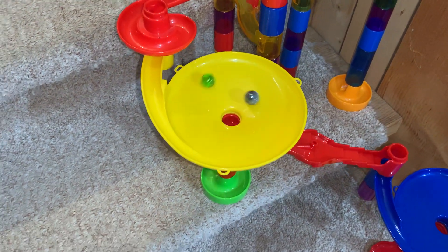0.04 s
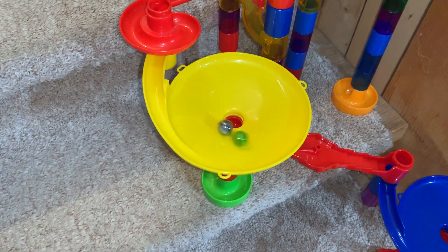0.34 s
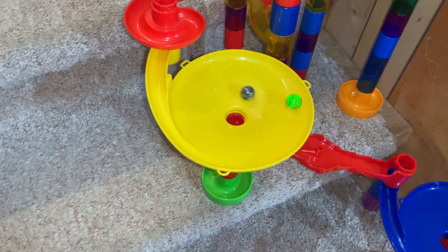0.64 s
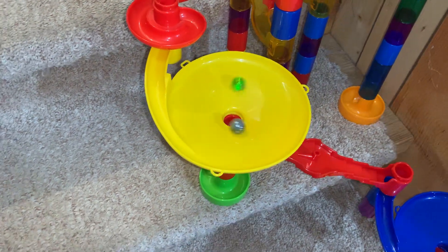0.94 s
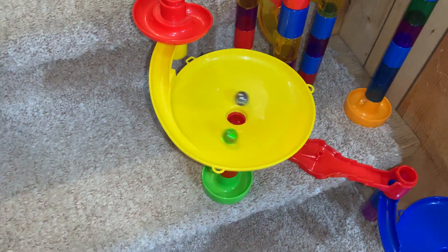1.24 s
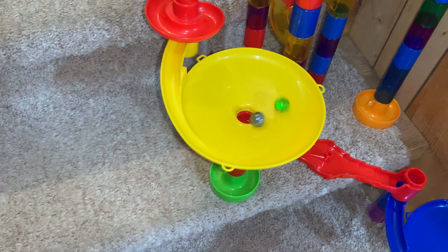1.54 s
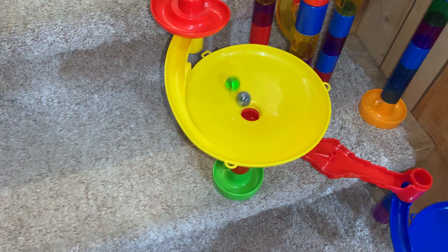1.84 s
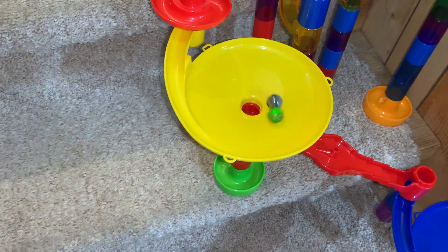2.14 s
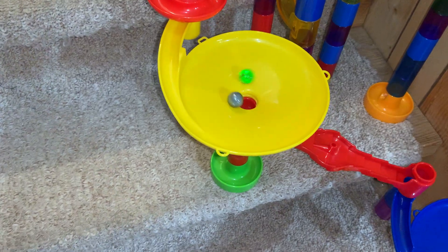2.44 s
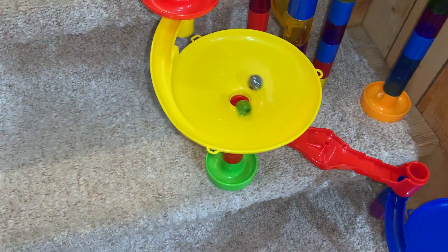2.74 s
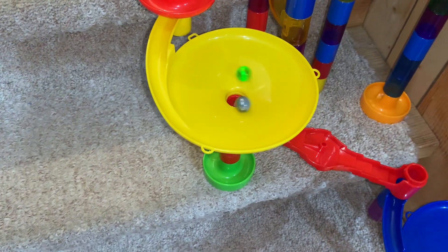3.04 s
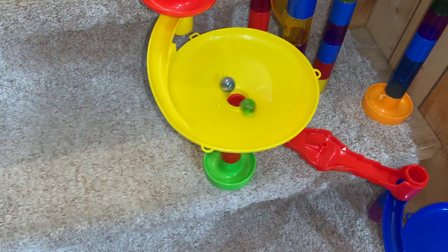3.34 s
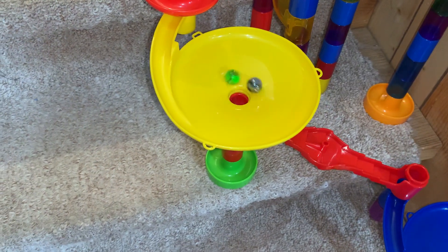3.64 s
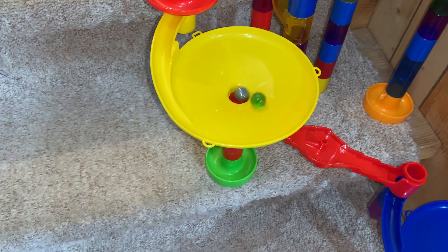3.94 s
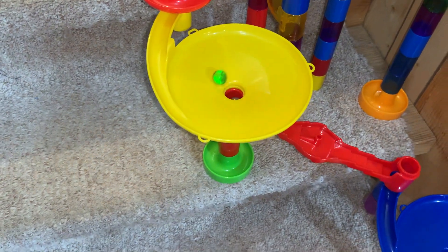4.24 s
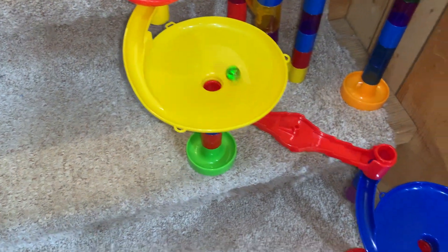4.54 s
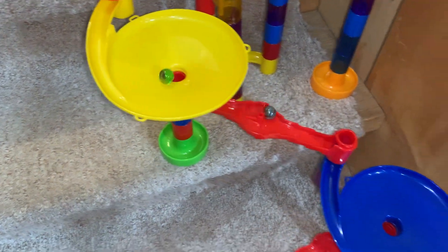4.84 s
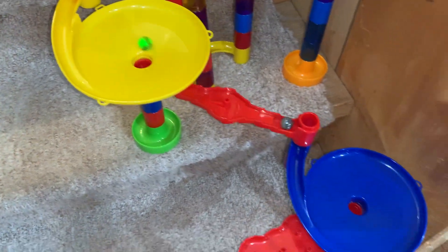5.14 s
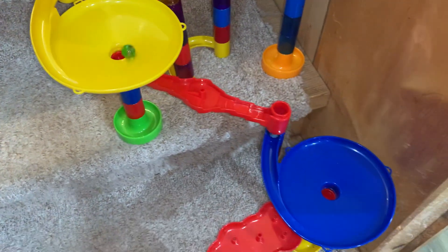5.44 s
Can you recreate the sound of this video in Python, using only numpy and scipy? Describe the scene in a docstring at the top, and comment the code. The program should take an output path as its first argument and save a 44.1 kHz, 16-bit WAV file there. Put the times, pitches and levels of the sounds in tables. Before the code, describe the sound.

A steel marble and a glass marble circle a plastic funnel with a hollow, gritty rolling sound, swelling each turn and dotted with light ticks. The steel one whirls faster, drops with a sharp clack, bounces and clatters down a bumpy plastic ramp into a tube, while the other rolls on faintly. Heard in stereo in a small carpeted room over a low rumble and hum.

```python
"""Two marbles in a marble run

A stereo microphone pair in a small carpeted room. A steel and a glass marble circle a plastic funnel,
ringing its modes and swelling once a turn as their orbits quicken. They touch once. The steel one whirls
round the throat, drops, bounces and clatters down a bumpy ramp into a tube while the glass one rolls on.
A low rumble and a steady hum lie underneath."""
import sys
import numpy as np
from scipy import signal
from scipy.fft import rfft, irfft, next_fast_len
from scipy.io import wavfile
from scipy.ndimage import uniform_filter1d

SR = 44100
rng = np.random.default_rng(int(sys.argv[2]) if len(sys.argv) > 2 else 0)


def unload_audio(sound):
    """Save the sound as a 16-bit wav file, at the path given as the first command line argument."""
    columns = np.transpose(np.atleast_2d(sound))
    # keep every value between -1 and 1, then stretch to whole-number steps
    steps = np.round(np.clip(columns, -1, 1) * 32767)
    wavfile.write(sys.argv[1], SR, steps.astype(np.int16))


N = 250488
TIME = np.arange(N) / SR
ROOM_SAMPLES, RING_SAMPLES = 16384, 6144  # lengths of the room tail and of a part's ring
KNOCK_S = .02  # a knock's level refers to its energy spread over this time

# The glass marble circles wide and fades; the steel one whirls up near the throat and drops.
# Each row: time in seconds, level in dB, grit offset in dB.
GLASS_ROLL = [(0, -39.5, -19), (0.65, -44, -18.5), (1.8, -43, -20), (2.5, -46, -21), (3.3, -54.5, -16.5),
              (4.4, -46, -20.5), (5.3, -64, -25), (5.68, -69, -25)]
STEEL_ROLL = [(0, -47, -40), (0.85, -46.5, -34), (0.97, -50.5, -3), (1.24, -46.5, -11), (1.36, -49, -26),
              (2.7, -44.5, -16), (3.13, -43, -27), (3.22, -42.5, -21.5), (3.7, -43.5, -24.5),
              (3.88, -33.5, -9), (4.08, -33.5, 1.5), (4.14, -41.5, 10.5), (4.17, -52, -19)]
# Orbits quicken as they shrink.
# Each holds: starting turns per second, their gain per second, first loud moment in turns.
GLASS_ORBIT = (1.0, .25, .2)
STEEL_ORBIT = (2.44, .29, .26)
# Rough spots under the glass marble.
# Each row: middle in seconds, length in seconds, level in dB, grit offset in dB, whirr offset in dB.
GLASS_SCUFFS = [(0.03, 0.034, -45, -5.5, 1.5), (0.175, 0.058, -36, -11, -9), (0.338, 0.051, -42, -13, -5),
                (0.5, 0.097, -41.5, -12.5, -18), (0.945, 0.048, -41.5, -8, 1), (1.05, 0.026, -40, -16, -16),
                (1.25, 0.026, -35, -13, -12), (1.42, 0.024, -38, -15.5, -13), (1.59, 0.048, -43.5, -4, 0),
                (1.728, 0.022, -47.5, 0, 11), (1.852, 0.009, -41, -25, -14), (2.05, 0.049, -46.5, -3.5, -9),
                (2.29, 0.042, -42, -14, -14), (2.425, 0.057, -35, -17, -29), (2.56, 0.013, -35, -22, -14),
                (2.755, 0.029, -38.5, -14, -7.5)]
# The steel marble's chatter on the ramp, weaker while it hops. Each row: time in seconds, level in dB.
RAMP_CHATTER = [(4.41, -53), (4.46, -40), (4.58, -45.5), (4.69, -38), (4.77, -46), (4.86, -37),
                (4.91, -50.5), (4.97, -43), (5.09, -46), (5.16, -58.5), (5.25, -37.5), (5.33, -37),
                (5.39, -62)]

# Knocks along the run; the spot of contact decides which modes ring. Each row: start in seconds,
# level in dB, then offsets in dB for the low modes, those near 1.3 kHz, the upper ones and the click.
FUNNEL_KNOCKS = [(0.325, -44.5, -5, 4, 6, -2), (0.515, -42, 8, 4, -3, -7), (0.797, -45.5, -7, 6, 2, -11.5),
                 (0.9404, -37.5, -5, -8, 3, -15), (1.047, -31.5, -14, -3, -13, -11),
                 (1.212, -40, -11, 3, -8, -6), (1.367, -35, -6, -7, -15, -36),
                 (1.5415, -40.5, 3, -6, -1, -8.5), (1.578, -39.5, 1, 0, -1, -23),
                 (1.701, -37.5, -10, -18, -1, -15), (1.847, -31, -1.5, -7, -15, -33),
                 (1.893, -33, -23, -6, -12, -23), (1.997, -41, 10, 10, 1.5, -6.5),
                 (2.062, -42, 4.5, 4, -1, -7), (2.521, -37.5, -3, -1, -14, -8),
                 (2.672, -49.5, 16.5, 16, 5, 0), (2.853, -44, 10, 12, -5, -26),
                 (2.9065, -35, -9, -7, -12, -30), (3.106, -36, -1, -2, -16.5, -30),
                 (3.146, -45, 11.5, 10.5, -15, -10.5), (3.292, -56.5, 10, 6, 10, -7),
                 (3.486, -40, -3, 7, -10, -22), (3.6414, -41, 2, 6, -12, -23),
                 (3.7267, -48, -11, -1, -6, -27), (3.822, -42.5, 11, -11, 7, -4),
                 (3.880, -40.5, 1, -10, 4, -20), (3.894, -28, 3, -8, -4, -13),
                 (3.921, -34.5, -1, -7, -6, -0.5), (4.0006, -36, 10.5, -2, -7, 7.5),
                 (4.0096, -28, -2, -16, -8, -3), (4.0266, -37, 13, -15, -2, 8), (4.040, -41, 11, -7, 2, 1),
                 (4.0708, -28.5, 5.5, -8, -6, 7.5), (4.129, -39, -4, -4.5, -5, 4),
                 (5.655, -39, 5, -1, 0, -9)]
DROP_KNOCKS = [(4.1508, -6, -4, 0, -21, -6), (4.156, -21.5, -9, 0, 9.5, 8),
               (4.1615, -13, -13.5, 0, -16, -14), (4.3678, -34, 5.5, 0, -9, -31)]
RAMP_KNOCKS = [(4.4412, -14.5, -6.5, 2.5, -7.5, -2), (4.469, -27.5, 0.5, -5, -11, 3.5),
               (4.486, -28, -11, 5, -17, -11), (4.527, -17.5, 1, -5.5, -3, -2),
               (4.5998, -16.5, -2.5, 2, 0, 1), (4.634, -38, 3, 0, -0.5, -10.5),
               (4.6517, -24, 0.5, 2, -0.5, 4.5), (4.6685, -26, 3, 6, -19, 10),
               (4.7015, -22.5, 1.5, 4, 6.5, 5.5), (4.709, -23.5, 0, -5, 4, -6),
               (4.779, -34.5, -3.5, 6, -5, -7), (4.802, -47, -2.5, 4, -3.5, -13),
               (4.8238, -20.5, -5, -8, 4.5, 1.5), (4.848, -30, -5.5, 9.5, -4, 0),
               (4.9335, -17, -5, 5.5, -2.5, 1.5), (4.9525, -28, -4, 0, -8, 0.5),
               (5.0277, -17.5, 0, 1.5, 6.5, -1), (5.1055, -13.5, -6, -7, -9, -5.5),
               (5.1765, -24, -5, -0.5, 10.5, 2.5)]
TUBE_KNOCKS = [(5.2132, -17.5, 5.5, 2.5, -5.5, 5.5), (5.224, -31.5, 3.5, 0, -5, -4.5),
               (5.2398, -21.5, -1.5, 5, 0, -1), (5.255, -34.5, -2.5, 1, 3, -12),
               (5.2712, -15.5, 3.5, -5.5, 8.5, 3), (5.2808, -30, -0.5, 1, 5, 10),
               (5.3052, -42, -4, 2, 12, 3.5), (5.319, -33.5, 3, 1.5, -8.5, 8.5)]

# What each kind of contact excites in the plastic. Each row: frequency in Hz, relative level in dB.
BOWL_PUSH = [(200, 8.5), (600, -4.5), (800, -3), (1080, -1), (1330, -6), (1500, 1), (1950, -0.5),
             (2400, -5), (5000, -22.5), (9000, -31.5)]  # soft rolling out in the bowl reaches many modes
THROAT_PUSH = [(200, -5), (600, -7), (820, 1.5), (1050, 0), (1300, 2.5), (1500, -6), (1850, -7),
               (3000, -17), (6000, -41.5)]  # near the throat, mainly the low ones
GLASS_GRIT = [(1400, -18), (2000, -3), (2700, 2), (3700, -4), (4800, 7), (5600, 8), (7000, -1.5),
              (10000, -3.5), (13000, -19), (15000, -27)]
STEEL_GRIT = [(1400, -10.5), (2000, -0.5), (2700, 2.5), (3700, -7), (4800, 6), (5600, -0.5), (7000, 3),
              (9000, -5), (10100, 1), (11500, -9), (13000, -6.5), (15000, -6)]  # harder, so it sparkles higher up
WHIRR_PUSH = [(1500, -32), (2000, 6), (2300, 4), (2750, 8), (3100, -23), (5000, -16.5)]
LANDING_PUSH = [(280, 8), (500, 1.5), (800, -2), (1250, -4.5), (1600, 4.5), (2100, 2.5), (2600, 0),
                (12000, 4)]
SLAP_PUSH = [(300, -9), (800, -1.5), (1600, -3.5), (2200, -5.5), (4000, -21), (9000, -26.5)]
CHATTER_PUSH = [(300, 6.5), (900, 0), (2000, 4), (4000, -0.5), (6500, -1), (12000, -14)]

# Main modes of the plastic parts. Each row: frequency in Hz, width in Hz, relative level in dB.
FUNNEL_MODES = [(302, 76, -21), (414, 90, -20.5), (600, 42, -18.5), (811.2, 34.7, 2), (871, 20, -5.5),
                (1259.6, 20.6, 0.5), (1331, 24.5, 3.5), (1474, 54, -12), (1638, 18, -0.5), (1861, 31, -2),
                (1746, 30, -8.5), (1950, 71, 1), (2130, 53, -11.5), (2449, 62, -7), (2713, 35, -6.5),
                (2856, 25, -4), (3994, 34, -8), (4685, 140, -19), (6316, 44, -16.5), (6960, 130, -15.5)]
RAMP_MODES = [(361, 19, -18.5), (481, 22, -21.5), (554, 15, -18), (825.3, 25.6, 3), (862, 25, -5),
              (892, 25, -7.5), (1240, 11, -3), (1360, 42, -19.5), (1533, 23.3, 3.5), (1640, 41, -6),
              (1930, 73, -9.5), (2034, 22, -7.5), (2130, 40, -11.5), (2200, 20, -20), (2553, 43, -2.5),
              (2675, 44, -20), (3170, 14, -28), (3614, 39, -14.5), (4260, 28, -13.5), (4890, 50, -17),
              (6150, 52, -16), (7250, 83, -29), (11900, 91, -34)]
TUBE_MODES = [(343, 14, -19), (477, 12, -14.5), (578, 7.2, -16), (805, 24.3, 3.5), (838, 33.5, 1.5),
              (878, 25, 3.5), (1256, 17, -2), (1580, 25, -11), (1653, 29, -4), (1960, 44, -10.5),
              (2057, 40, -3), (2230, 21, -4), (2551, 29, 3.5), (2840, 49, -10.5), (3100, 63, -18.5),
              (4220, 55, -15)]
# The crowd of weaker shell modes. Each row: frequency in Hz, relative level in dB.
FUNNEL_SHELL = [(150, -20.5), (400, 4), (650, 0), (1100, 7), (1450, -12), (2000, 10.5), (2300, 0),
                (2700, 3.5), (4000, 0.5), (5400, -10), (6700, -4), (8500, -3.5), (10200, -3.5),
                (15000, -10)]
RAMP_AND_TUBE_SHELL = [(150, -7), (400, -15.5), (650, -15), (820, 1), (1050, 7.5), (2000, -0.5),
                       (3200, 0.5), (5300, -6), (7500, 2), (9000, -1), (11000, -1.5), (13000, -10.5),
                       (15000, -5)]

# Low background rumble, with a faint whirr of rolling near 1.5 kHz.
# Each row: frequency in Hz, relative level in dB.
RUMBLE_SPECTRUM = [(15, -76.5), (25, -48), (32, -23.5), (45, -5), (58, -0.5), (80, 1.5), (98, -9),
                   (125, -5), (170, -13.5), (260, -17.5), (400, -17.5), (700, -27), (1500, -22.5),
                   (2500, -49), (7000, -62.5), (16000, -60)]
# The rumble eases once only one marble is left in the funnel. Each row: time in seconds, level in dB.
RUMBLE_LEVEL = [(0, -42), (0.9, -42.5), (2.1, -42.5), (3.4, -43), (4.8, -43.5), (5.35, -45.5),
                (5.68, -45.5)]
# The room's hum. Each row: frequency in Hz, rms level in dB.
HUM_TONES = [(75.4, -73), (120, -60.5), (220.8, -49.5), (592, -71)]

# Stereo width at the microphones. Each row: frequency in Hz, side minus mid in dB.
MIC_WIDTH = [(60, -18), (130, -19.5), (300, -7.5), (800, -7.5), (1500, -0.5), (2500, 8), (5500, 8.5),
             (7500, -18.5), (16000, -0.5)]
# Phase between the microphones. Each row: frequency in Hz, lead of the left in radians.
MIC_PHASE = [(60, 0), (5000, 0), (7200, -1.4), (8500, -3.14), (10700, -6.1), (13300, -9.42), (15500, -12.3)]
# Their unequal sensitivity. Each row: frequency in Hz, left minus right in dB.
MIC_BALANCE = [(60, 0.5), (200, -4.5), (380, -0.5), (750, 2), (1300, 1.5), (2400, -0.9), (4400, -5),
               (8000, 0), (15000, 0.5)]


def rolling(funnel, motion, push_spectrum, grit_spectrum, specks, flutter_db, body_db, grit_db, glide_db,
            sectors=5, glide_hz=1880, swing_hz=201, half_width_hz=225):
    """A marble runs over countless tiny bumps, driving the funnel with soft push, grit and any whirr."""
    angle, push, sharp, whirr = motion
    flutter = amp(flutter_db * walk(70))
    drives = [(grit(scatter_db=1.5, share=.05) * push * amp(body_db), push_spectrum),
              (specks * sharp * amp(grit_db), grit_spectrum)]
    if whirr.any():
        drives.append((grit() * whirr, WHIRR_PUSH))
    out = 0
    for sector in 2 * np.pi * np.arange(sectors) / sectors:
        # each sector of the bowl favours other modes, so the ring glides down and up once a turn
        presence = flutter * np.maximum(np.cos(angle - sector), 0) * np.sqrt(4 / sectors)
        hz = glide_hz + swing_hz * np.cos(sector + .99)
        band = [(hz - half_width_hz, 0), (hz, glide_db), (hz + half_width_hz, 0)]
        spot = colour(funnel(sector, waver=.012), band)
        for force, spectrum in drives:
            out = out + convolve(force * presence, unit_energy(colour(spot, spectrum)))
    return out


def circling(roll, orbit, swing_db, scuffs=()):
    """A marble's angle in the bowl and the strengths of its soft push, its grit and its whirr."""
    start_hz, quickening, loud_turn = orbit
    angle = 2 * np.pi * (start_hz * TIME + quickening * TIME ** 2 / 2 - loud_turn)
    times, *columns = np.transpose(roll)
    level_db, grit_db = (np.interp(TIME, times, column) for column in columns)
    push = amp(level_db + swing_db * np.cos(angle))
    sharp, whirr = push * amp(grit_db), np.zeros(N)
    for middle_s, length_s, db, rough_db, whirr_db in scuffs:
        swell = amp(db) * np.exp(-2 * np.minimum(((TIME - middle_s) / length_s) ** 2, 20))
        push = np.hypot(push, swell)
        sharp = np.hypot(sharp, swell * amp(rough_db))
        whirr = whirr + swell * amp(whirr_db)
    return angle, push, sharp, whirr


def grit(scatter_db=6, share=.022):
    """Sparse sharp specks of uneven size under a marble."""
    specks = rng.standard_normal(N) * (rng.random(N) < share)
    return unit(specks * amp(scatter_db * rng.standard_normal(N)))


def plastic(modes, shell, phase_step, spot_db, fine_db, fine_width_hz, shell_db, shell_t60_s,
            crack_db, crack_t60_s, fine_count=32, detune=.007):
    """A moulded part; returns a function that gives its response at a new spot of contact."""
    fine_hz = 3000 + 13000 * (np.arange(fine_count) + rng.random(fine_count)) / fine_count
    fine_modes = [(hz, fine_width_hz, np.interp(hz, *np.transpose(shell))) for hz in fine_hz]
    fine_waves = mode_waves(fine_modes, phase_step)

    def response(angle=0, waver=0):
        """Main modes, fine treble modes, a crowd of weak ones and the crack of contact."""
        # the marble's weight detunes each mode a little, and a spot near a node hardly moves it
        chance = rng.standard_normal((len(modes), 2))
        bends = waver * np.cos(angle + np.arange(len(modes)))  # pitches bend as the marble circles
        spot_modes = [(hz * (1 + detune * pitch + bend), width, db + spot_db * strength)
                      for (hz, width, db), (pitch, strength), bend in zip(modes, chance, bends)]
        ring = unit_energy(mode_waves(spot_modes, phase_step).sum(axis=0))
        weights = rng.standard_normal(fine_count) * rng.random(fine_count)
        fine = unit_energy(np.tensordot(weights, fine_waves, 1))
        crowd = amp(shell_db) * burst(shell_t60_s, RING_SAMPLES)
        crack = amp(crack_db) * burst(crack_t60_s, RING_SAMPLES)
        noise = np.hypot(amp(shell_db), amp(crack_db)) * unit_energy(colour(crowd + crack, shell))
        return unit_energy(ring + amp(fine_db) * fine + noise)
    return response


def mode_waves(modes, phase_step):
    """The decaying wave of each mode at both microphones: modes x 2 x samples."""
    hz, width, db = np.transpose(modes)[:, :, None, None]
    t, k = TIME[:RING_SAMPLES], np.arange(len(modes))[:, None, None]
    # each mode radiates its own way, so it reaches the two microphones out of phase
    side = amp(np.interp(hz, *np.transpose(MIC_WIDTH)))
    spread = .5 * np.arctan(side) * (-1) ** k * np.array([[1], [-1]])
    # neighbouring modes that start out of step make the ring swell after the blow
    phase = 2 * np.pi * hz * t + k * phase_step + spread
    return amp(db) * width * np.exp(-np.pi * width * t) * np.sin(phase)


def knocks(table, part, gain_db, skid_db, skid_t60_s, lightness, rebound_db, slap_db=None):
    """Each blow rings the part, coloured by where and how hard the marble lands."""
    out = np.zeros((2, N))
    for start_s, db, low_db, middle_db, upper_db, click_db in table:
        # the lighter the touch, the more it skids and chatters
        chatter = rng.standard_normal((3, RING_SAMPLES)).prod(axis=0)
        skid = unit_energy(chatter * decay(skid_t60_s, RING_SAMPLES))
        force = signal.unit_impulse(RING_SAMPLES) + amp(skid_db - lightness * (db + 24)) * skid
        rebounds = (SR * rng.uniform(.006, .045, size=3)).astype(int)
        force[rebounds] += amp(rebound_db + 4.8 * rng.standard_normal(3))
        force = unit_energy(force)
        if slap_db is not None:
            force = force + amp(slap_db) * joint_rattle()
        ring = convolve(force, part())[:, :RING_SAMPLES]
        contact = [(950, low_db), (1150, middle_db), (1380, middle_db), (1490, 0), (2050, 0),
                   (2400, upper_db), (2900, upper_db), (3600, click_db)]
        add(out, start_s, amp(db + gain_db) * np.sqrt(KNOCK_S * SR) * colour(ring, contact))
    return out


def landing(funnel, t60_s):
    """The short, bright clack of the steel marble landing below the funnel."""
    return lambda: unit_energy(colour(funnel(), LANDING_PUSH) * decay(t60_s, RING_SAMPLES))


def bounces(start_s=4.2022, hop_s=.0294, restitution=.73, first_db=-17, loss_db=4, count=6):
    """Knock rows for the steel marble after its drop, each hop shorter and weaker than the last."""
    contact_db = (-3, 0, -14, -9)  # low, middle, upper, click
    times = start_s + hop_s * (1 - restitution ** np.arange(count)) / (1 - restitution)
    return [(s, first_db - loss_db * k, *contact_db) for k, s in enumerate(times)]


def joint_rattle(gap_s=.0145, scatter=.1186, loss_db=9, count=3):
    """The struck ramp rocks in its loose joints: a few dull slaps, each weaker than the last."""
    slaps, k = np.zeros(RING_SAMPLES), np.arange(count)
    when_s = gap_s * (k + 1 + scatter * rng.standard_normal(count))
    slaps[(SR * when_s).astype(int) % RING_SAMPLES] = amp(-loss_db * k)
    return colour(slaps, SLAP_PUSH)


def ramp_roll(ramp, flutter_db=3, contacts=3):
    """Between knocks the steel marble chatters along the ramp, touching its floor and both walls."""
    level_db = np.interp(TIME, *np.transpose(RAMP_CHATTER), left=-120, right=-120)
    level = amp(level_db + flutter_db * walk(50))
    out = 0
    for _ in range(contacts):
        force = grit(share=.006) * level
        out = out + convolve(force, unit_energy(colour(ramp(), CHATTER_PUSH)))
    return out / np.sqrt(contacts)


def marble_clack(start_s=3.7618, db=-36, t60_s=.016):
    """Steel meets glass: one very short, bright tick."""
    out = np.zeros((2, N))
    spectrum = [(1000, -31), (3000, -30), (6000, -2), (10000, 8.5), (12500, -3), (16000, -13)]
    tick = unit_energy(colour(burst(t60_s), spectrum))
    add(out, start_s, amp(db) * np.sqrt(KNOCK_S * SR) * tick)
    return out


def room(x, wet_db=-11, t60_s=.24, build_s=.0027):
    """Close walls send a short tail back to the microphones; the carpet dulls it."""
    build_up = 1 - np.exp(-(TIME[:ROOM_SAMPLES] / build_s) ** 2)
    tail = unit_energy(burst(t60_s) * build_up)
    dulled = colour(tail, [(300, 11.5), (2000, -2.5), (5000, -7), (10000, -8), (16000, -20)])
    return x + amp(wet_db) * convolve(x, dulled)


def background(swell_db=1.15, waver_db=1, drift_radians=.17):
    """A low rumble that swells and sinks, and a slightly wavering hum."""
    level_db = np.interp(TIME, *np.transpose(RUMBLE_LEVEL)) + swell_db * walk(5.1)
    rumble = unit(colour(stereo_noise(N), RUMBLE_SPECTRUM)) * amp(level_db)
    hum = 0
    for hz, db in HUM_TONES:
        peak = np.sqrt(2) * amp(db + waver_db * walk(4.17))
        hum = hum + peak * np.sin(2 * np.pi * hz * TIME + drift_radians * walk(12))
    return rumble + hum


def stereo_noise(size):
    """Diffuse noise as the microphone pair picks it up."""
    mid, side = rng.standard_normal((2, size))
    return unit(mid + np.array([[1], [-1]]) * colour(side, MIC_WIDTH))


def burst(t60_s, size=ROOM_SAMPLES):
    """A dense crowd of modes dying away together."""
    return unit_energy(stereo_noise(size) * decay(t60_s, size))


def decay(t60_s, size):
    """An envelope that falls 60 dB in t60_s."""
    return np.exp(-np.log(1000) * TIME[:size] / t60_s)


def walk(rate_hz):
    """Smooth random wander with a spread near 1."""
    hold = int(SR / rate_hz)
    steps = np.repeat(rng.standard_normal(N // hold + 1), hold)
    return unit(uniform_filter1d(steps, hold)[:N])


def amp(db):
    """Decibels to gain."""
    return 10 ** (np.asarray(db) / 20)


def unit(x):
    """Scale to rms 1."""
    return x / np.sqrt(np.mean(x ** 2))


def unit_energy(x):
    """Scale a response so that it passes the power of white noise unchanged."""
    return unit(x) / np.sqrt(x.shape[-1])


def over_hz(points, size):
    """Join (Hz, value) points on a log axis, for the bins of a transform."""
    hz, value = np.transpose(points)
    return np.interp(np.log(np.fft.rfftfreq(size, 1 / SR) + 1), np.log(hz), value)


def colour(x, points):
    """Minimum-phase filter with the given (Hz, dB) response."""
    size = 2 * next_fast_len(x.shape[-1] // 2 + 2048)
    cepstrum = irfft(np.log(amp(over_hz(points, size))))
    cepstrum[1:size // 2] *= 2
    cepstrum[size // 2 + 1:] = 0
    return irfft(rfft(x, size) * np.exp(rfft(cepstrum)))[..., :x.shape[-1]]


def convolve(x, response):
    """Play a signal through a stereo response."""
    return signal.oaconvolve(np.atleast_2d(x), response, axes=1)[:, :N]


def add(out, start_s, sound):
    """Mix a sound in at a time."""
    start = int(start_s * SR)
    out[:, start:start + sound.shape[1]] += sound[:, :N - start]


def scene():
    """Both marbles on the run, heard from within the small room."""
    funnel = plastic(FUNNEL_MODES, FUNNEL_SHELL, phase_step=.66, spot_db=2.5, fine_db=-10.5,
                     fine_width_hz=48, shell_db=-8, shell_t60_s=.035, crack_db=-7.5, crack_t60_s=.031)
    ramp = plastic(RAMP_MODES, RAMP_AND_TUBE_SHELL, phase_step=2.31, spot_db=1.5, fine_db=-8.5,
                   fine_width_hz=120, shell_db=-12.5, shell_t60_s=.075, crack_db=-9.5, crack_t60_s=.025)
    tube = plastic(TUBE_MODES, RAMP_AND_TUBE_SHELL, phase_step=2.36, spot_db=.5, fine_db=-7.5,
                   fine_width_hz=110, shell_db=-17, shell_t60_s=.068, crack_db=-9, crack_t60_s=.022)
    in_funnel = knocks(FUNNEL_KNOCKS, funnel, gain_db=0,
                       skid_db=-4, skid_t60_s=.018, lightness=.4, rebound_db=-30)
    drop = knocks(DROP_KNOCKS, landing(funnel, t60_s=.14), gain_db=-3.5,
                  skid_db=10, skid_t60_s=.035, lightness=.4, rebound_db=-52)
    hops = knocks(bounces(), landing(funnel, t60_s=.17), gain_db=-2.5,
                  skid_db=-24, skid_t60_s=.008, lightness=.16, rebound_db=-43.5)
    on_ramp = knocks(RAMP_KNOCKS, ramp, gain_db=-1.7,
                     skid_db=0, skid_t60_s=.026, lightness=.25, rebound_db=-22, slap_db=-2.5)
    in_tube = knocks(TUBE_KNOCKS, tube, gain_db=-.5,
                     skid_db=-1, skid_t60_s=.022, lightness=.3, rebound_db=-30)
    glass_motion = circling(GLASS_ROLL, GLASS_ORBIT, swing_db=2, scuffs=GLASS_SCUFFS)
    glass = rolling(funnel, glass_motion, BOWL_PUSH, GLASS_GRIT, grit(share=.05),
                    flutter_db=2.5, body_db=-4, grit_db=-1, glide_db=6.5)
    steel_motion = circling(STEEL_ROLL, STEEL_ORBIT, swing_db=2.4)
    steel = rolling(funnel, steel_motion, THROAT_PUSH, STEEL_GRIT, grit(share=.017),
                    flutter_db=1.5, body_db=-3.5, grit_db=-.5, glide_db=3)
    clatter = in_funnel + drop + hops + on_ramp + in_tube + ramp_roll(ramp) + marble_clack()
    return room(glass + steel + clatter) + background()


def record(dry):
    """The microphones differ in phase and sensitivity; peaks are rounded and the top is cut steeply."""
    ceiling, top_hz = .8, 15900
    size = 2 * next_fast_len(N // 2 + ROOM_SAMPLES)
    tilt = amp(over_hz(MIC_BALANCE, size) / 2)
    microphones = np.array([tilt * np.exp(1j * over_hz(MIC_PHASE, size)), 1 / tilt])
    heard = irfft(rfft(dry, size) * microphones)[:, :N]
    rounded = heard / (1 + (heard / ceiling) ** 4) ** .25
    return signal.sosfilt(signal.ellip(8, .2, 70, top_hz, fs=SR, output="sos"), rounded)


dry = scene()
out = record(dry)
unload_audio(out)
```